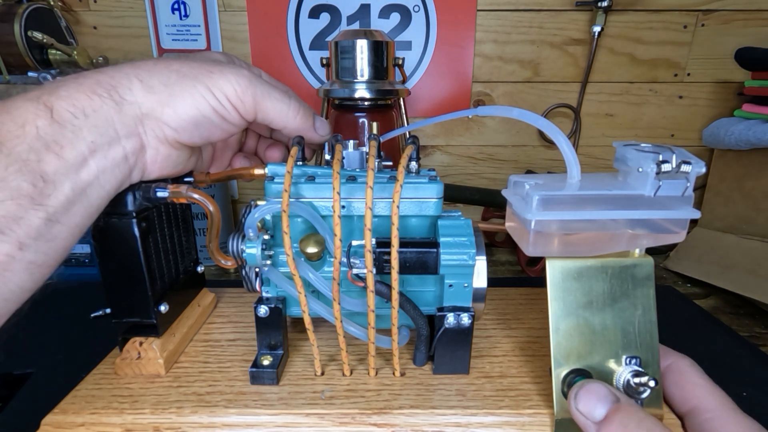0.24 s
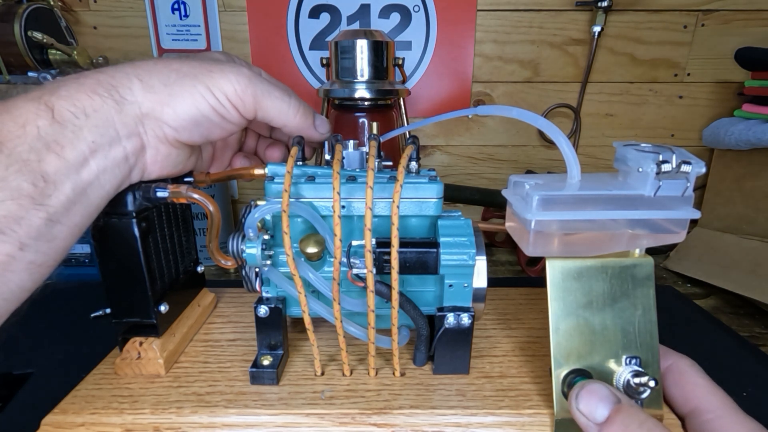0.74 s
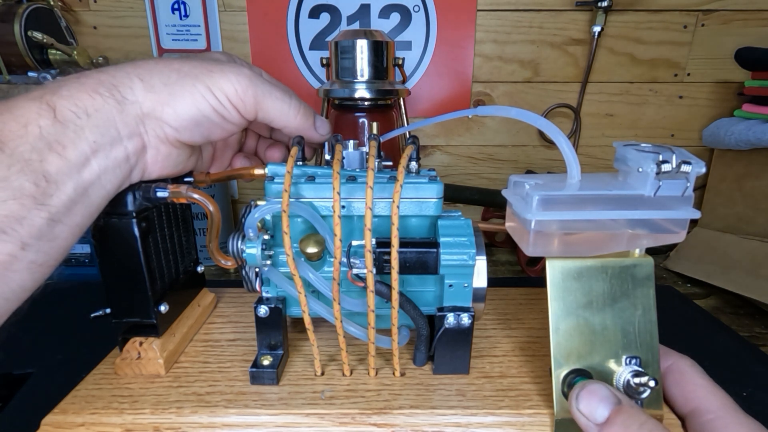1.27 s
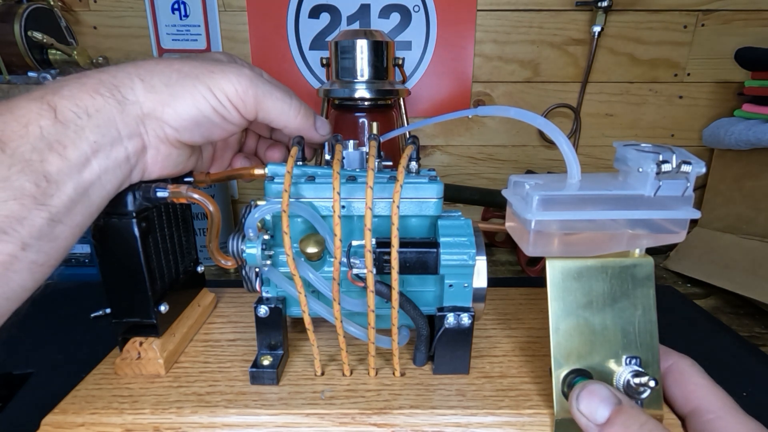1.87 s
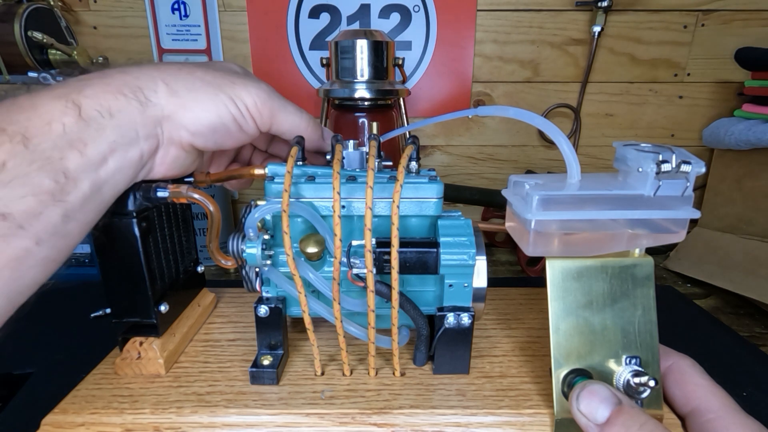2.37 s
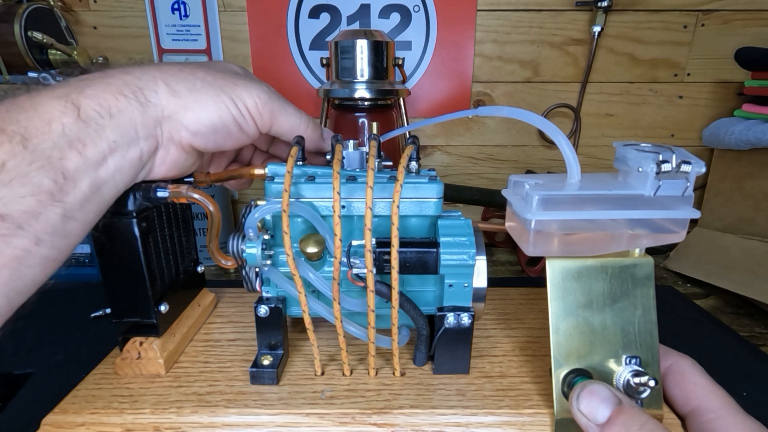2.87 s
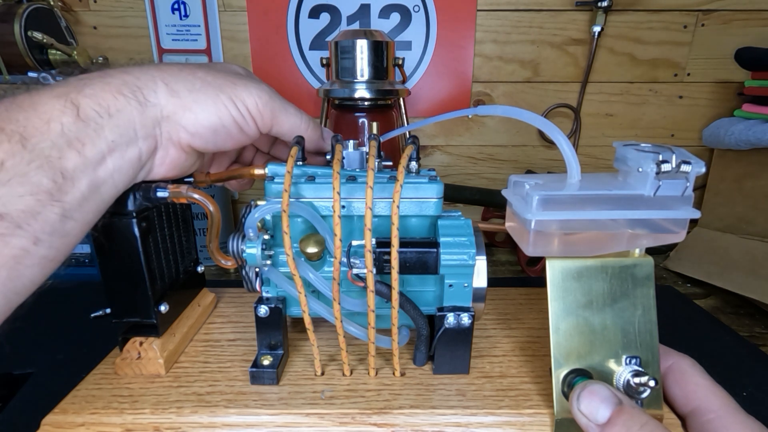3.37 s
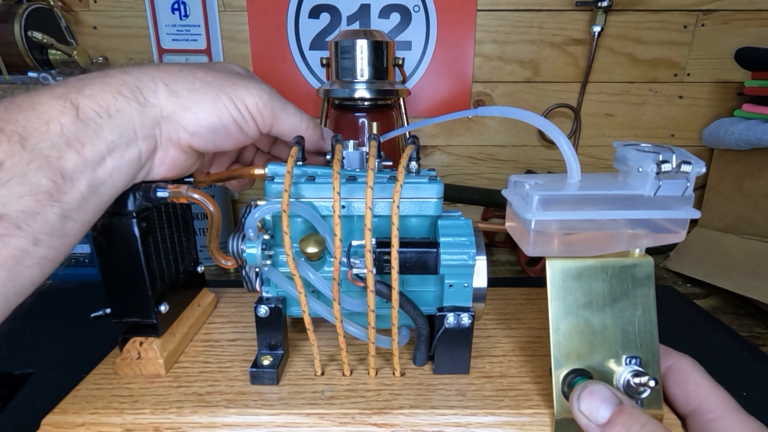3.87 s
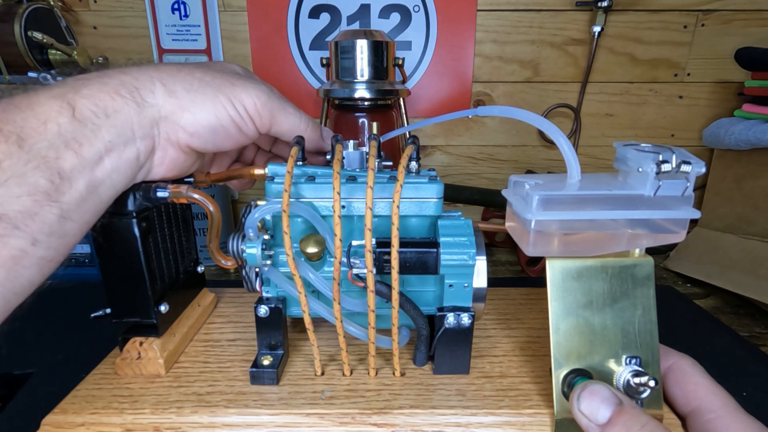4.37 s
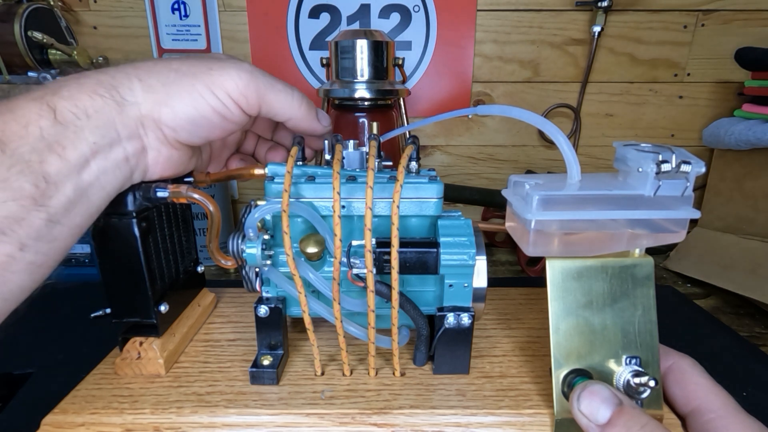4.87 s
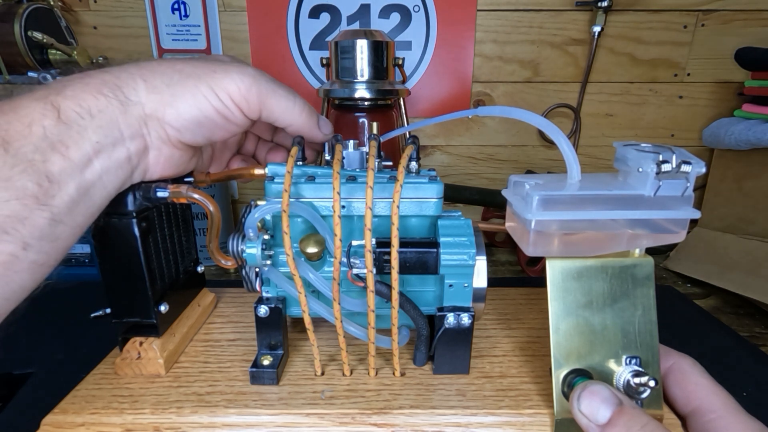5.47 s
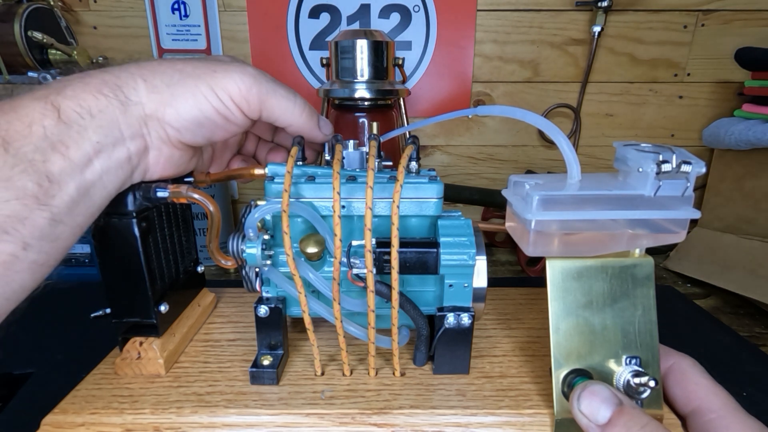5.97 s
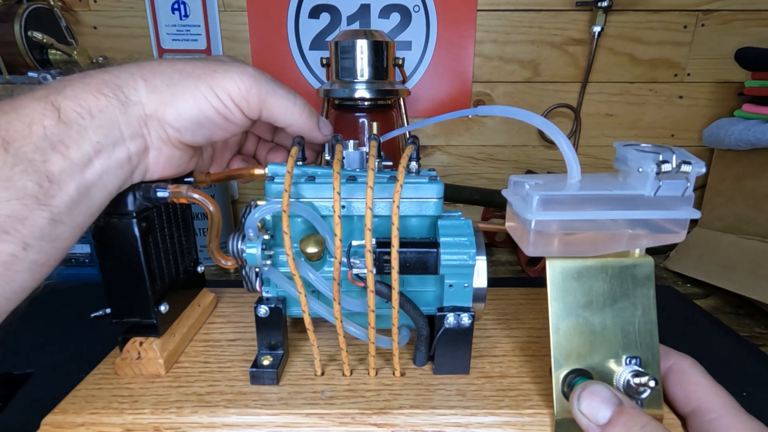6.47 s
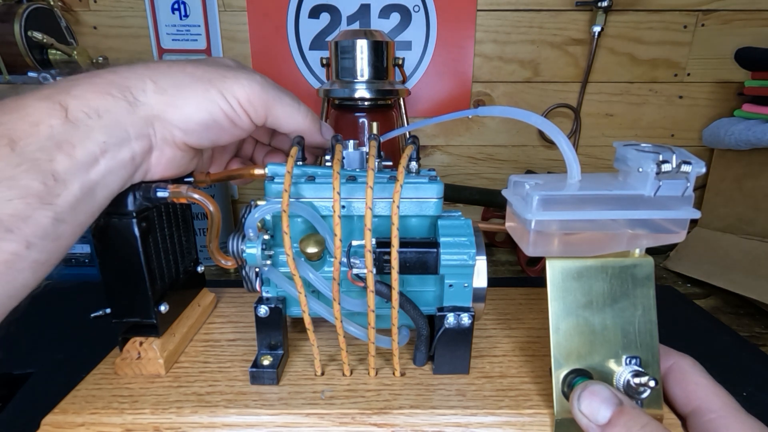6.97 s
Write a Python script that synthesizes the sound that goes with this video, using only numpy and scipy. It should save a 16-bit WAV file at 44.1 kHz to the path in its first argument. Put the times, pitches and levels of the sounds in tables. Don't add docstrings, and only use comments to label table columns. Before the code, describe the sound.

A faint low shop ambience opens the scene. At about 0.12 s small button and gear clicks lead into a short starter tap, a rough, low, labouring grind with a woody thump near 0.2 s, stalling and cutting off around 0.45 s. After a brief near-silence, a sharp click at 0.63 s starts the second press; its pitch begins low and climbs within a fraction of a second. From about 0.85 s the crank runs continuously to the end, around 7 s. Dense metallic tooth rattle and a nasal gear whine swoop down and up roughly fourteen times a second, alternating hard and soft compressions, so a strong chugging wobble comes about seven times a second. It quickens slightly around 2.5 to 3.3 s, then settles and slows a little late. Low shaft hum and hollow board resonance pulse beneath. Close stereo pickup, small wooden room; the engine never fires.

```python
import sys
import numpy as np
from scipy import signal
from scipy.fft import rfft, irfft
from scipy.io import wavfile
from scipy.ndimage import uniform_filter1d

SR = 44100
rng = np.random.default_rng(int(sys.argv[2]) if len(sys.argv) > 2 else 0)


def transcribe(u):
    v = np.clip(np.atleast_2d(u).T, -1, 1)
    q = np.round(v * 32767).astype(np.int16)
    wavfile.write(sys.argv[1], SR, q)


def volts(x):
    e = np.asarray(x, float) / 20
    return 10 ** e


N = 318843
T, F = np.arange(N) / SR, np.fft.rfftfreq(N, 1 / SR)

# time in seconds, crank angle in cycles, drive level in dB.
TAP = [(.136, -1.33, -38), (.165, -1.27, -28), (.215, -1.17, -30), (.232, -1.15, -41), (.262, -1.13, -38),
       (.278, -1.1, -25), (.345, -.9, -21.5), (.435, -.71, -22.5), (.448, -.69, -45)]
# time in seconds, crank angle in cycles, drive level in dB.
RESTART = [(.606, -.66, -58), (.625, -.65, -36), (.64, -.63, -25.5), (.685, -.51, -24), (.755, -.25, -24)]
# position of fastest turning in cycles, tooth rate there in Hz,
# position of slowest turning in cycles, tooth rate there in Hz, gear load in dB.
CYLINDERS = [
    (-.015, 999.6, 0.11, 619.9, -1),
    (.245, 1126, 0.32, 454.3, -2),
    (.48, 940, .625, 699.6, -3),
    (.755, 1123, 0.83, 493, -0.5),
]
RUNNING_DB = -22.5


def over_hz(table):
    hz, value = np.transpose(table)
    return np.interp(np.log(F + 1), np.log(hz + 1), value)


def colour(x, db):
    return irfft(rfft(x) * volts(db), N)


def unit(x):
    return x / np.sqrt(np.mean(x ** 2))


def ring(x, hz, width):
    return signal.lfilter(*signal.iirpeak(hz, hz / width, fs=SR), x)


def walk(rate):
    hold = int(SR / rate)
    steps = np.repeat(rng.standard_normal(N // hold + 1), hold)
    return 1.3 * uniform_filter1d(uniform_filter1d(steps, hold), hold)[:N]


def shop_air():
    # frequency in Hz, spectral density in dB per Hz.
    ambient = [(18, -88), (30, -17), (86, -34), (122, -6), (200, -37), (800, -52), (1250, -47), (1740, -52),
               (2600, -44), (3340, -58), (5380, -40), (8030, -61), (12000, -62), (15600, -89),
               (22000, -120)]
    return volts(-50) * unit(colour(rng.standard_normal(N), over_hz(ambient)))


def room(x, colour_db, t60):
    t = T[:SR // 2]
    tails = rng.standard_normal((2, len(t))) * np.exp(-np.log(1000) * t / t60) * (t > .002)
    tails /= np.sqrt(np.sum(tails ** 2, axis=1, keepdims=True))
    return signal.fftconvolve(colour(x, over_hz(colour_db))[None], tails, axes=1)[:, :N]


def ports(x):
    # frequency in Hz, lead of the left port in radians.
    lead = [(30, 0), (500, .1), (2150, .5), (2760, 1.1), (4130, .3), (6980, .1), (7490, .8), (8960, 1.2),
            (9300, .6), (11400, .8), (13000, 1.5)]
    # frequency in Hz, left minus right level in dB.
    balance = [(60, 0), (300, 0), (700, .5), (1300, .3), (4400, 0), (8100, -1), (15000, 0)]
    half = over_hz(balance) * np.log(10) / 40 + .5j * over_hz(lead)
    return np.array([irfft(rfft(x) * np.exp(side * half), N) for side in (1, -1)])


def switch():
    # time in seconds, peak level in dB.
    clicks = [(0.118, -36), (0.138, -34), (0.611, -50), (0.634, -18)]
    out, t = np.zeros(N), T[:800]
    for s, db in clicks:
        start = int(s * SR)
        burst = rng.standard_normal(len(t)) * np.exp(-t / 0.0042)
        out[start:start + len(t)] += volts(db) * burst
    return ring(out, 2200, 3313)


def board(turn, push_db):
    knocks = np.diff(np.floor(turn / 7), prepend=0) * 30 + .5 * rng.standard_normal(N)
    push = volts(push_db + 1.2 * walk(25)) * knocks
    main_mode = ring(ring(push, 367.0, 36.0), 380, 64)
    return unit(main_mode + 0.55 * ring(ring(push, 406, 54), 454, 180))


def shaft(turn, hum_db):
    spin = 2 * np.pi * turn / 7
    hum = np.sin(spin + 0.68 * walk(40)) + 0.25 * np.sin(spin / 2) + 0.24 * np.sin(2 * spin)
    return unit(ring(volts(1.2 * hum_db + 1.3 * walk(20)) * hum, 130, 220))


def rattle(turn, stroke_db, loads_db, hum_db):
    # frequency in Hz, spectral density in dB per Hz.
    spectrum = [(30, -9), (70, -2), (130, 7), (296, -16.5), (400, -42), (600, -16), (1030, -4.5),
                (1500, -6), (2000, -10), (3200, -5.5), (5500, -1.5), (8000, -16.5), (12000, -24.5),
                (15700, -43)]
    # frequency in Hz, width in Hz, level in dB.
    casing = [(530, 225, 7), (786, 130, -5.5), (978, 42, -17), (2000, 130, -5.5), (2400, 250, 5),
              (2621, 330, 3.5), (2840, 130, -9), (3148, 100, 5.5), (3430, 33, 5), (3960, 300, 4),
              (4690, 470, -11), (4738, 380, 11), (5620, 580, 5.5), (6080, 130, 8), (6410, 300, 6.5),
              (7130, 560, 2.5), (9140, 1320, 11)]
    strength = volts(2.46 * rng.standard_normal(int(turn[-1]) + 2))
    tooth = strength[turn.astype(int)] * (1.0 + np.exp(-(turn % 1) / 0.048))
    shape = over_hz(spectrum)
    shape += sum(db / (1 + (2 * (F - hz) / w) ** 2) for hz, w, db in casing)
    shape -= 12 / (1 + (F / 200) ** 4)

    load, squeak, hum = (c - c.mean() for c in (loads_db.max(axis=0), loads_db[-1], hum_db))
    common, out = volts(stroke_db + 0.53 * walk(70) + 0.29 * walk(30)), 0
    for hz in 100 * 2 ** np.arange(0, 7.5, .5):
        band = np.clip(1 - 2 * np.abs(np.log2(np.maximum(F, 100) / hz)), 0, 1) ** .5
        follow = .22 * np.exp(-(np.log2(hz / 900) / .9) ** 2) * load
        follow += .12 * np.exp(-(np.log2(hz / 3800) / .4) ** 2) * squeak
        follow += .9 * (hz < 250) * hum
        noise = irfft(rfft(tooth * rng.standard_normal(N)) * band * volts(shape), N)
        out = out + volts(1.35 * walk(60) + follow) * noise
    return unit(out * common)


def whine(turn, loads_db):
    orders = (1, 2, 7 / 3, 4)
    wobble = (.4, .5, .95, .45)
    # frequency in Hz, width in Hz, level in dB.
    modes = [(458, 112, 9.5), (623, 135, 3), (849, 108, 5.5), (1034, 72, 5.5), (1159, 228, 5),
             (1257, 230, 10), (1537, 127, 6.5), (1853, 34, 10), (2347, 115, 2), (2530, 67, 4),
             (3450, 99, 20), (3851.6, 270, 17.5)]
    tone = 0
    for k, rough, db in zip(orders, wobble, loads_db):
        level = volts(db + 1.2 * walk(25) + 1.8 * walk(90))
        tone = tone + level * np.sin(2 * np.pi * k * turn + rough * walk(250))
    block = sum(volts(db) * ring(ring(tone, hz, w), hz, 3 * w) for hz, w, db in modes)
    return unit(block + 0.52 * ring(tone, 720, 570))


def cycle():
    # lag in cycles, spread in cycles, level in dB.
    soft = [(0.02, 0.099, 5), (0.1026, .028, 2), (-0.0055, 0.058, -1), (-0.0081, 0.051, -5),
            (0.19, 0.081, 3), (0.16, 0.062, 2.5), (0.086, 0.011, -1)]
    hard = [(.005, .065, 3.5), (.035, .02, 3), (.01, .06, 4), (.05, .03, -20), (.125, .065, 3),
            (.11, .06, 8), (.11, .05, -3)]
    rest_db = [-12, -22, -12, -24, -12, -6, 1]
    # lag in cycles, spread in cycles, rattle level in dB.
    clack = (.02, .012, 3)
    fall, rise = 1.3, 2.1
    at = np.arange(0, 1, 1 / 400)
    top, fast, low, slow, load = np.transpose(CYLINDERS)
    since = (at - top[:, None]) % 1
    k = since.argmin(axis=0)
    u, drop, gap = since.min(axis=0), (low - top)[k], ((np.roll(top, -1) - top) % 1)[k]
    falling = slow[k] + (fast - slow)[k] * np.clip(1 - u / drop, 0, 1) ** fall
    recovered = 1 - np.clip((gap - u) / (gap - drop), 0, 1) ** rise
    rising = (np.roll(fast, -1) - slow)[k] * recovered

    def bump(c, lag, spread):
        return np.exp(-(((since[c] - lag + .5) % 1 - .5) / spread) ** 2)

    levels = []
    for j, (rest, *pair) in enumerate(zip(rest_db, soft, hard)):
        level = rest + np.zeros(len(at))
        for c, (lag, spread, db) in enumerate(2 * pair):
            level += (db + load[c] * (j < 4) - rest) * bump(c, lag, spread)
        levels.append(level)
    levels = np.array(levels)
    levels[-1] += clack[2] * (bump(1, *clack[:2]) + bump(-1, *clack[:2]))
    return at, falling + rising, levels


def crank():
    # start in seconds, half-way point in seconds,
    # relative rattle at the first hard compression in dB, and at the second in dB.
    cycles = np.array([(0.845, 0.993, -2.5, 0.5), (1.15, 1.292, 0, 2.3), (1.428, 1.569, 0, -0.2),
                       (1.702, 1.842, 0, 0), (1.97, 2.109, 0.5, 0), (2.241, 2.373, 1, -0.5),
                       (2.507, 2.633, 1.5, 1), (2.76, 2.882, 1.5, 2), (3.005, 3.127, 1.5, 1),
                       (3.25, 3.392, 1, 1), (3.519, 3.663, -0.5, 0.5), (3.8, 3.934, -0.5, -0.3),
                       (4.077, 4.212, 0, 1), (4.35, 4.486, 0.5, 1), (4.626, 4.764, -0.5, 2),
                       (4.899, 5.03, -0.5, 2), (5.176, 5.316, -0.5, 2), (5.456, 5.596, 0, 0.5),
                       (5.737, 5.872, 1.5, 1), (6.005, 6.148, -1.5, 1), (6.292, 6.435, -0.3, 0.5),
                       (6.577, 6.725, -1, 1.5), (6.882, 7.032, -1, 0), (7.176, 7.337, 1, 0)])
    halves, starts = cycles[:, :2].ravel(), cycles[:, 0]
    s, early, _ = np.transpose(TAP + RESTART)
    angle = np.interp(T, np.r_[s, halves], np.r_[early, np.arange(len(halves)) / 2])
    pace = np.interp(T, (starts[1:] + starts[:-1]) / 2, (.275 / np.diff(starts)) ** .3)
    pace *= 1 - .35 * np.exp(-np.abs(T - RESTART[0][0]) / .15) * (T > TAP[-1][0])
    at, hz, levels = cycle()
    hz, *levels = (np.interp(angle, at, c, period=1) for c in (hz, *levels))
    bites = np.c_[cycles[:, 2:].ravel(), np.zeros(len(halves))].ravel()
    bite = np.interp(angle, CYLINDERS[1][2] + np.arange(-1, len(bites)) / 4, np.r_[0, bites])
    bite += -7.5 * np.exp(-((angle + 1 - CYLINDERS[0][2] - .03) / 0.042) ** 2)
    return hz * pace * (1 + .012 * walk(14)), bite, np.array(levels[:4]), *levels[4:]


def scene():
    # time in seconds, shaft level in dB.
    intake = [(.9, -2), (2.2, -3), (2.6, 2.5), (3.4, 1.5), (4.5, -1), (5, -5), (7.2, -2.5)]
    # frequency in Hz, level in dB.
    room_db = [(30, -12), (80, -22.5), (400, -12), (1500, -15), (3000, -8), (6000, -14.5), (9000, -22),
               (14000, -24)]
    # frequency in Hz, level against direct in dB.
    near_db = [(30, -10), (100, -22), (500, -13), (1200, -17), (2400, -8), (4500, -14), (8000, -5),
               (11000, 0), (13000, 6)]
    hz, bite_db, load_db, hum_db, push_db, stroke_db = crank()
    turn = np.cumsum(hz) / SR
    s, _, drive = np.transpose(TAP + RESTART)
    drive_db = np.interp(T, s, drive) - RUNNING_DB
    tap = (T > s[0]) & (T < TAP[-1][0] + 0.025)
    on = uniform_filter1d(1. * (tap | (T > RESTART[0][0])), size=200)
    stand_db = .35 * drive_db - 16 * np.exp(-np.abs(T - RESTART[0][0]) / 0.017)

    teeth = volts(bite_db) * rattle(turn, stroke_db, load_db, hum_db)
    labour = np.clip(-drive_db / 8, 0, 1) * volts(-20 + 0.26 * drive_db)
    engine = volts(RUNNING_DB + 1.0 + drive_db) * teeth + labour * ring(teeth, 1070, 910)
    engine += volts(-27.5 + 1.2 * drive_db) * whine(turn, load_db)
    shaft_db = -37.5 + stand_db - 5 * tap + np.interp(T, *np.transpose(intake))
    engine += volts(shaft_db) * shaft(turn, hum_db)

    jolt_db = 11.5 * np.exp(-((T - .19) / 0.025) ** 2)
    board_db = -35.5 + stand_db + 9.5 * tap + jolt_db
    boom = ring(on * volts(board_db) * board(turn, push_db * (1 - 0.33 * tap)), 389.0, 76)
    dry = on * engine + boom + switch()
    heard = dry + shop_air()
    return ports(heard) + room(heard, room_db, t60=0.26) + room(dry, near_db, t60=0.045)


def band_limit(x):
    return signal.sosfilt(signal.butter(12, 15890, fs=SR, output="sos"), x)


def record(dry):
    top = signal.ellip(8, .2, 70, 15700, fs=SR, output="sos")
    rounded = np.tanh(1.975 * dry) / 1.732
    return band_limit(signal.sosfilt(top, rounded))


dry = scene()
out = record(dry)
transcribe(out)
```